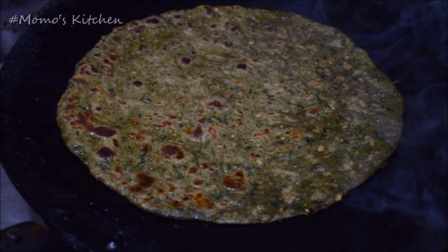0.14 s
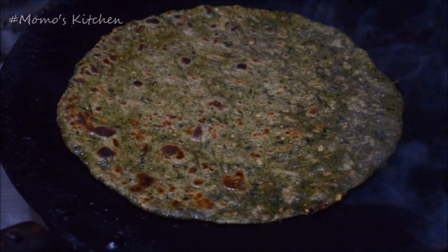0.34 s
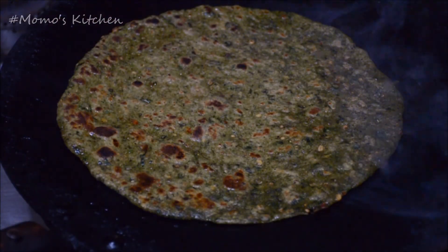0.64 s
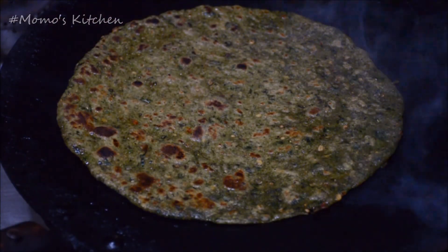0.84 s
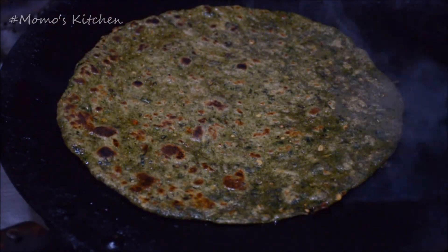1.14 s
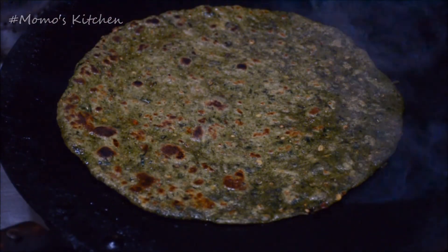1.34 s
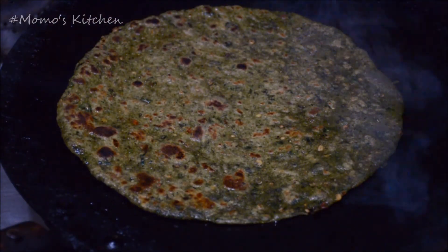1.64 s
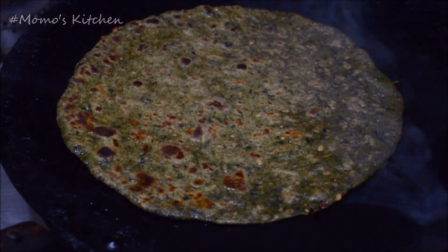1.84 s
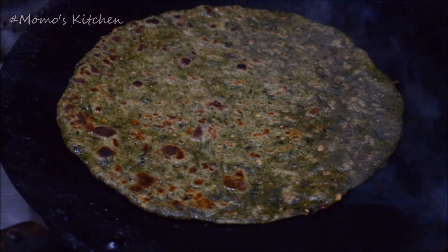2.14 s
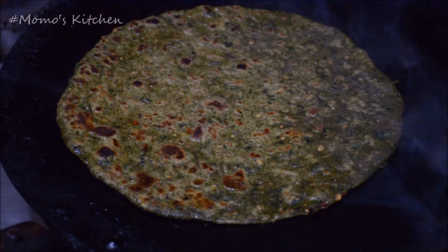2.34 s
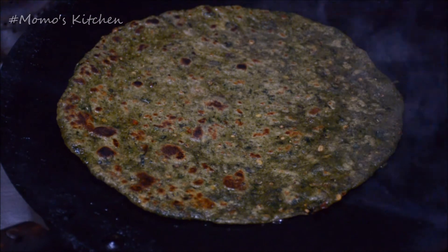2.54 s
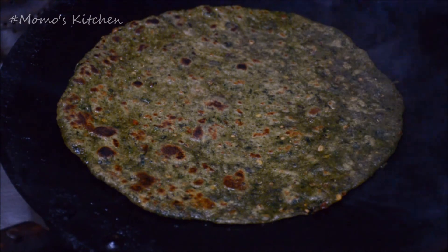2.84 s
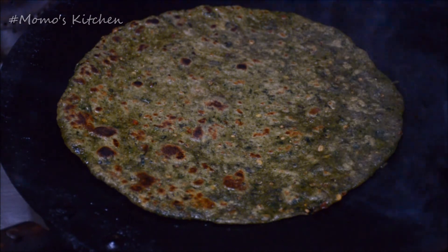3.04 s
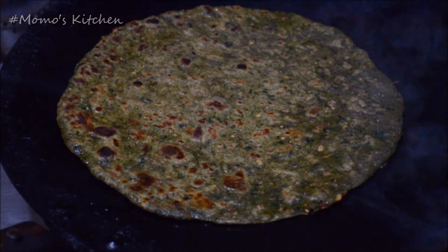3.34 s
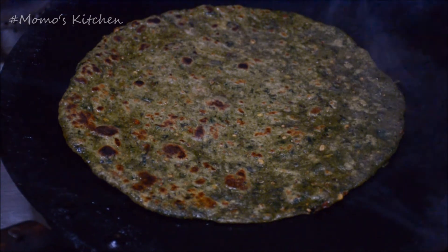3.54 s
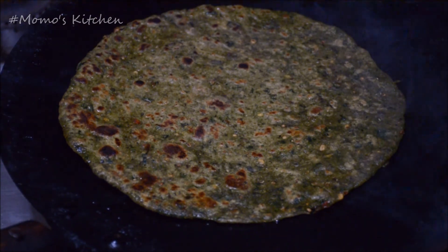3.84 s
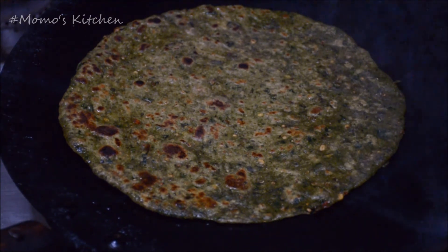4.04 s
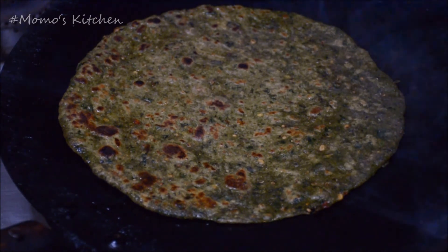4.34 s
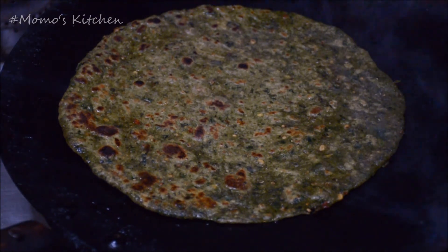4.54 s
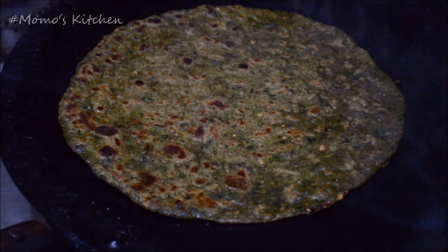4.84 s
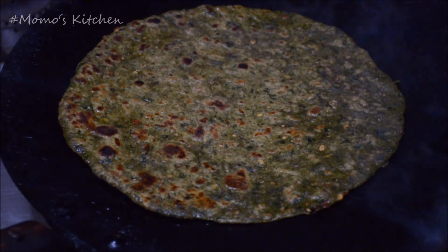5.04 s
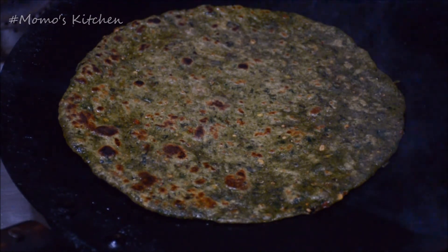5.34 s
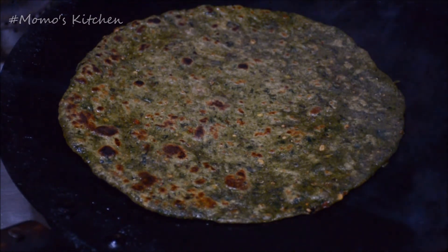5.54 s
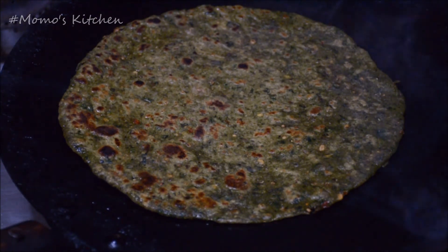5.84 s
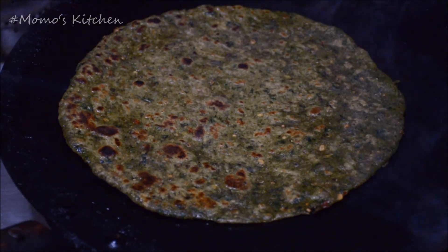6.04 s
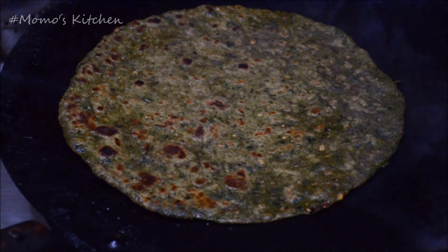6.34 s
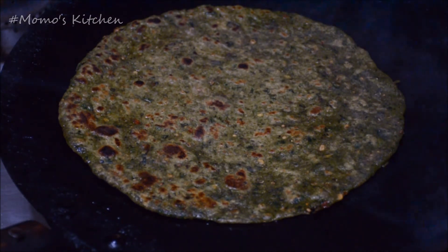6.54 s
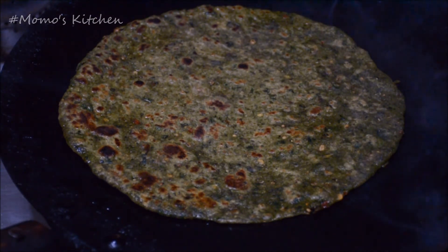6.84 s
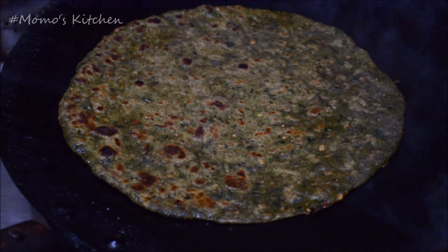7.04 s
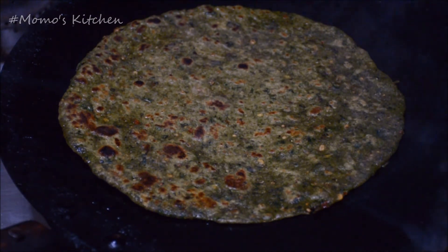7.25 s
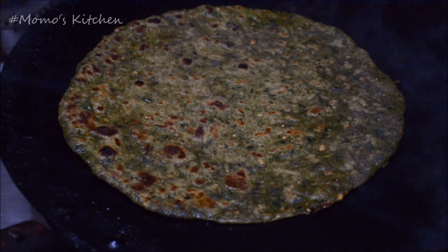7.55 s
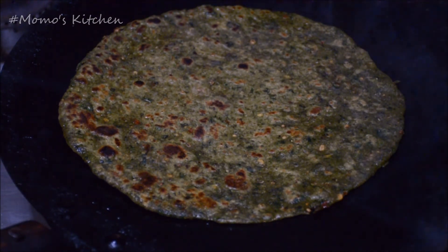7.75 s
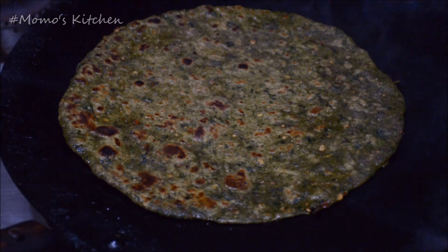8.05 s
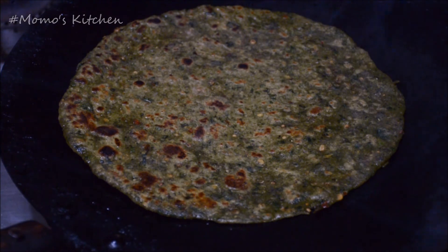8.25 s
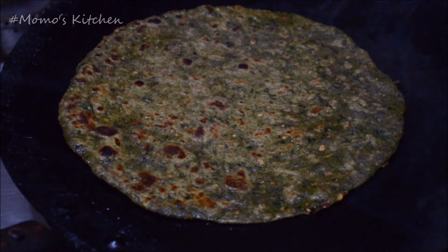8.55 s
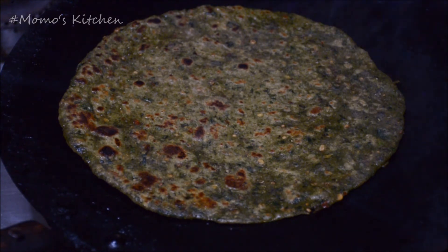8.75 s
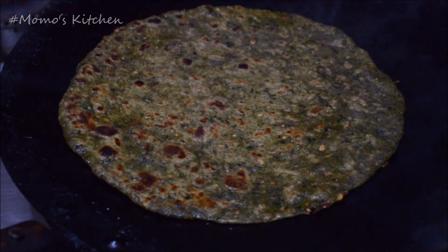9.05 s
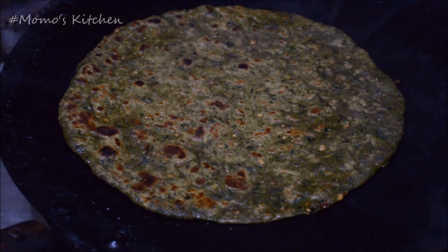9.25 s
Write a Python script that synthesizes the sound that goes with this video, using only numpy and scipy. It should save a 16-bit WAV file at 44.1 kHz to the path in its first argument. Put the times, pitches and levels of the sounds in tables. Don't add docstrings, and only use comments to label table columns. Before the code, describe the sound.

A flatbread fries on an iron griddle, heard from very near in a small, lightly reverberant kitchen. Soft hiss swells and fades over quiet room tone. Irregular bursts under the bread give short, hollow metallic knocks, while fat droplets make sharp, dry clicks with tiny bubbly rebounds and low puffs of air. It starts sparse, grows busiest in the middle, calms after six seconds, and ends on renewed knocks and spits.

```python
import sys
import numpy as np
from scipy import signal
from scipy.fft import rfft, irfft, next_fast_len
from scipy.io import wavfile
from scipy.ndimage import uniform_filter1d, map_coordinates

SR = 44100
rng = np.random.default_rng(int(sys.argv[2]) if len(sys.argv) > 2 else 0)


def dump(signal):
    limited = np.clip(np.atleast_2d(signal).T, -1, 1)
    pcm = np.round(limited * 32767).astype(np.int16)
    wavfile.write(sys.argv[1], SR, pcm)


def elevation(decibels):
    levels = np.asarray(decibels, float)
    return 10 ** (levels / 20)


N = 414099

# time in seconds, level in dB.
ROOM_LEVEL = [
    (0.0, -60.5),
    (2.07, -60.5),
    (2.3, -58.5),
    (2.51, -64.5),
    (4.26, -60.5),
    (4.42, -59),
    (6.49, -63),
    (8.39, -60),
    (9.02, -58),
    (9.39, -61),
]
# frequency in Hz, level in dB per Hz.
ROOM_COLOUR = [(120, -30), (200, -6), (447, -1.5), (577, -3.5), (655, -4), (1220, -5), (1550, -6.5),
               (1850, -5), (4300, -18), (11500, -27), (15700, -39)]
# frequency in Hz, level in dB per Hz.
DRAUGHT_COLOUR = [(15, -3), (40, 2), (120, -1.5), (300, -10.5), (500, -42)]
# frequency in Hz, level in dB per Hz.
PORT_HISS = [(59, -44), (100, -1), (532, -5.5), (1240, -21), (3570, -15.5), (4510, -13.5), (15700, -11)]
# start in seconds, length in seconds, narrow jet in dB, broad sizzle in dB, low fry in dB.
STEAM_SWELLS = [(0.194, 0.17, -81, -74.5, -75), (0.61, 0.19, -96, -85, -64), (0.775, 0.11, -86, -94, -63),
                (0.856, 0.47, -81, -75.5, -71), (1.287, 0.14, -85, -74, -78), (1.49, 0.3, -85, -74, -67),
                (2.465, 0.6, -82, -80, -67), (3.077, 0.21, -72, -72, -67), (3.359, 0.29, -74, -66.5, -63),
                (3.804, 0.2, -80, -84, -66), (4.522, 0.31, -71.5, -89, -66), (5.12, 0.048, -86, -65.5, -65),
                (5.292, 0.25, -76, -68.5, -61.5), (6.407, 0.52, -73.5, -85, -63.5),
                (7.31, 0.3, -75, -72.5, -69.5), (7.905, 0.71, -99, -81, -84), (8.373, 0.11, -80, -78, -62),
                (8.532, 0.32, -72.5, -86, -65)]
# centre in Hz, width in Hz, level in dB.
JET_PEAKS = [(3900, 900, -10), (5220, 500, 3), (6400, 1500, -12), (9600, 960, -16)]
# centre in Hz, width in Hz, level in dB.
SIZZLE_PEAKS = [(5730, 4700, -10), (7000, 2700, 5), (11300, 2900, -3.5)]
# centre in Hz, width in Hz, level in dB.
FRY_PEAKS = [(2180, 4100, -2), (3720, 4200, -23.5)]
# time in seconds, peak in dB, width in ms.
AIR_PUFFS = [(0.1574, -30, 0.5), (1.141, -42, 0.19), (1.654, -44, 0.8), (1.852, -47, 1.8),
             (2.48, -36.5, 1.95), (2.631, -35.5, 1.06), (2.6413, -40, 0.84), (3.442, -35, 1),
             (3.455, -22.5, 0.76), (3.9953, -31.5, 1.54), (4.2127, -23, 0.24), (4.2237, -33, 2.6),
             (4.3023, -28, 1.07), (4.762, -31.5, 2.3), (4.8166, -26, 0.55), (5.3792, -18.5, 1.27),
             (5.989, -28, 0.21), (6.1243, -41, 0.7), (6.222, -37, 0.79), (6.5472, -33.5, 1.8),
             (6.571, -22, 0.73), (7.155, -15, 0.24), (7.2726, -16, 0.36), (7.486, -39, 0.97),
             (7.526, -42, 1.3), (7.5356, -42, 1), (8.341, -29.5, 1.85), (8.616, -37, 2.4),
             (8.747, -38.5, 1.4), (8.991, -29, 2.4), (8.9936, -20, 0.2), (9.006, -30, 0.47),
             (9.017, -32, 1.24), (9.1194, -32.5, 3.4), (9.2211, -37.5, 1.6)]
# time in seconds, peak in dB, width in ms.
AIR_SUCTIONS = [(0.1591, -30, 0.83), (0.182, -34.5, 0.54), (0.268, -26.5, 0.33), (0.9205, -35.5, 0.9),
                (1.062, -18.5, 1.03), (2.081, -30.5, 1.47), (2.4764, -29, 0.28), (2.9985, -32, 0.51),
                (3.119, -41, 1.5), (4.0717, -38.5, 6.7), (4.2043, -8.5, 0.17), (4.7418, -33.5, 0.53),
                (4.9302, -34, 0.79), (4.947, -27.5, 1.85), (4.9871, -41, 2.8), (5.384, -33, 2.2),
                (5.4861, -37, 1.1), (5.5061, -36, 0.55), (5.5919, -31, 1.1), (5.8973, -30, 1.36),
                (6.003, -28.5, 0.86), (6.0912, -39.5, 1.65), (7.495, -32.5, 2.6), (7.7802, -27.5, 1.1),
                (8.048, -46, 0.8), (8.096, -45.5, 1.5), (8.489, -31.5, 0.24), (8.544, -33.5, 2.17),
                (8.6105, -41, 0.7), (8.7092, -34.5, 0.78), (9.276, -36, 2.5)]
# time in seconds, peak in dB, width in ms, splash in dB relative to the peak.
DROPLET_SPITS = [(0.2682, -23, 0.097, -32), (1.1703, -25, 0.05, -12), (2.663, -36.5, 0.41, -31),
                 (3.4212, -41, 0.45, -13), (3.4555, -16, 0.13, -42), (4.2042, -13.5, 0.15, -38),
                 (4.241, -21, 0.12, -38), (4.7696, -17.5, 0.13, -40), (4.788, -28, 0.15, -34),
                 (4.8129, -25, 0.12, -37), (5.381, -9.5, 0.15, -26), (5.9071, -17.5, 0.12, -39),
                 (5.9201, -25, 0.092, -28), (6.0018, -33, 0.099, -29), (6.5423, -29.5, 0.4, -34),
                 (6.5706, -24.5, 0.16, -38.6), (6.588, -34, 0.081, -33), (7.156, -37, 0.14, -33),
                 (7.2722, -19.5, 0.072, -18), (7.278, -32, 0.099, -23), (9.0066, -26, 0.13, -36),
                 (9.017, -22.5, 0.11, -44), (9.085, -24, 0.07, -27)]
# rebound rate in Hz, level in dB relative to the spike.
SPIT_REBOUNDS = [(1220.0, -21), (2200.0, -19), (1000.0, -26), (6300.0, -14), (2080, -6), (1470.0, -11.5),
                 (2200.0, -12), (1050.0, -15), (1920.0, -19), (1920.0, -12), (870, -25), (1100.0, -17),
                 (1760.0, -19), (2590.0, -3), (920.0, -25), (5430, -25), (1430, -21), (2100.0, -12),
                 (2550, -43), (1000.0, -3), (1290, -26), (6340, -34), (1220.0, -10)]
# time in seconds, peak in dB, width in ms, splash in dB relative to the peak.
BUBBLE_COLLAPSES = [(0.1577, -20, 0.1, -21.5), (0.2055, -32, 0.12, -26), (0.9203, -31, 0.51, -38),
                    (1.0636, -19.5, 0.24, -41), (1.1414, -20.5, 0.17, -33), (3.218, -22, 0.097, -29),
                    (4.0024, -18.5, 0.15, -29.5), (4.379, -20.5, 0.14, -37), (4.413, -37, 0.17, -31),
                    (4.7506, -26.5, 0.12, -36), (4.8164, -23, 0.13, -30), (4.9107, -22.5, 0.099, -14.5),
                    (5.0303, -21, 0.11, -30), (5.459, -28, 0.098, -23), (5.4853, -28, 0.096, -16.5),
                    (5.5051, -30, 0.12, -32), (5.5912, -10, 0.11, -27), (5.8478, -32.5, 0.057, -7),
                    (5.9887, -28, 0.12, -32), (6.105, -39, 0.3, -26), (6.1256, -19, 0.13, -29),
                    (6.3143, -27, 0.17, -38), (7.7804, -11.5, 0.13, -27.5), (8.469, -33, 0.14, -21),
                    (8.648, -37, 0.13, -16), (9.1066, -26.5, 0.09, -22), (9.1232, -17, 0.12, -34),
                    (9.276, -15, 0.12, -34)]
# rebound rate in Hz, level in dB relative to the spike.
COLLAPSE_REBOUNDS = [(950, -15), (1760.0, -17), (3680.0, -25), (1630.0, -23), (1130.0, -27), (1630, -8),
                     (1630.0, -15), (1420.0, -15), (1170, -3), (1030, -12), (2100.0, -10), (2680, -6.5),
                     (2080, -10.5), (980.0, -24), (2760.0, -12), (770.0, -27), (800, -14.5), (2760.0, -23),
                     (1760.0, -12), (3680.0, -30), (1780, -15), (1220.0, -10), (1095, -11.5), (2200.0, -7),
                     (3150.0, -22), (1750, -6), (1340.0, -30), (2000.0, -14)]
# centre in Hz, width in Hz, level in dB.
CAPSULE_PEAKS = [(3340, 500, 8), (4440, 470, 11), (6900, 2060, 8.5), (8600, 4000, -3.5)]
# frequency in Hz, level in dB, decay by 60 dB in seconds.
GRIDDLE_MODES = [(435, -18.5, 0.86), (571, -8.5, 0.43), (587.7, 0.5, 0.38), (650, -11, 0.15),
                 (748.2, 1.5, 0.18), (891, -8, 0.48), (910.6, -5.5, 0.17), (1067, -1.5, 0.17),
                 (1150, -13.5, 0.12), (1190, -3.5, 0.22), (1240, -6, 0.35), (1303, -4.5, 0.35),
                 (1354, -4, 0.29), (1403, -7, 0.19), (1576, -31, 0.068), (1696, -4, 0.32),
                 (1778, -1.5, 0.26), (2016, -10, 0.46), (1850, -3, 0.23), (1916, -0.5, 0.36),
                 (2178, -17, 0.2), (2300, -31, 0.1), (2400, -12, 0.4), (2630, -5, 0.14),
                 (2782, -8.5, 0.083)]
# time in seconds, peak in dB, low modes and crack in dB relative to the peak, favoured mode in Hz.
BIG_BURSTS = [(1.291, -29, -4.5, -23, 1374), (2.1243, -28.5, 9, -2.5, 1310),
              (2.1406, -21, -5.5, -15.5, 1276), (2.1741, -22, -4, -20, 1160),
              (2.367, -25.5, -6.5, -11, 1285), (2.9928, -24.5, 3, -5, 1255),
              (3.1696, -24, -1.5, -13.5, 1175), (3.834, -27.5, 2, -8.5, 1240), (3.8904, -29, 0, -23, 1208),
              (4.305, -27, 3, -7, 1240), (4.4782, -15.5, -4, -14.5, 1170), (4.8373, -25, 2.5, -9, 1100),
              (5.0585, -17, -4.5, -16, 1193), (5.3706, -28, 3.5, -5.5, 1240), (5.636, -17, -5.5, -21, 1110),
              (5.861, -24.5, -1, -11, 1140), (7.1406, -27.5, -4, -27.5, 1370), (7.4689, -31, -6.5, 7, 1340),
              (8.347, -28.5, 4.5, -3.5, 1240), (8.766, -17, -5.5, -17, 1200),
              (9.0402, -27, 3.5, -9.5, 1220), (9.3143, -16.5, -4.5, -11.5, 1164)]
# modes near 590 Hz and near 900 Hz, in dB over the 750 Hz mode.
BIG_BURST_SHARES = [(7, -21), (5, -4), (4, 5), (-9, 1), (10, -2), (-2.5, 3), (-13, -5), (2.5, -9),
                    (-6, -14), (4, 10), (-1, -6), (5.5, 2), (4.5, -16), (1, 4), (2.5, -12), (5, 2.5),
                    (0.5, -9), (-5, 4), (5.5, 0), (5.5, -9), (3.5, 3.5), (8.5, -7)]
# time in seconds, peak in dB, low modes, crack and high modes in dB relative to the peak.
SMALL_POPS = [(0.391, -54.5, 14, 2, 0), (0.5077, -23.5, 1, -10.5, -5), (0.6548, -39, -3, -28, -23),
              (0.7787, -45.5, -25, -6, -10), (0.805, -44, -20, -4, -14), (0.843, -54, 10.5, -20, -17),
              (0.866, -50, -8, -15, -14), (1.3222, -35, -29, -22, -15), (1.4384, -49.5, 10.5, -24, -14),
              (1.5264, -70.5, 10, 16, 15.5), (2.0917, -49.5, 12, 1, 0.5), (2.111, -38.5, 0, 6.5, -3),
              (3.4445, -33, 4.5, -14, -21), (3.8198, -34.5, 0.5, -2.5, -8), (6.4194, -32.5, -2, -22, -17),
              (6.508, -57, 5, 5, -3), (6.5883, -58.5, 10, 10, 5), (6.8437, -52, 0, -7, -18),
              (6.8598, -45, 10.5, -4, -10), (6.9272, -45.5, 1, -19, -21), (7.446, -50.5, -3, -3, -2),
              (7.4826, -25, -5.5, -10.5, 2.5), (7.896, -40, 13.5, -6, -10),
              (8.8199, -33.5, -23, -39, -15.5), (8.915, -56.5, 18, 1, -3)]
# modes near 590 Hz and near 900 Hz in dB over the 750 Hz mode, favoured mode in Hz.
SMALL_POP_SHARES = [(-15, -11, 1290), (8, -16, 1244), (-4, -10, 1200), (-5, -10, 1300), (-9, -10, 1310),
                    (5, -12, 1250), (0, -5, 1300), (5, -7, 1330), (-2, -8, 1280), (16, 3, 1357),
                    (-4, -9, 1308), (2, -2, 1314), (-5, -4, 1300), (-9, 3, 1250), (0, -15, 1254),
                    (0, -5, 1240), (-7, -8, 1550), (-7, -4, 1300), (-5, 0, 1250), (0, -10, 2100),
                    (-7, 2, 1250), (-11, 2.5, 1300), (-10, -8, 1249), (21, -2, 1244), (-7, -8, 1190)]
# frequency in Hz, level in dB.
WALL_COLOUR = [(250, -3), (420, 0), (1200, -2.5), (1600, 0.5), (2200, 3.5), (3200, -10.5), (6000, -23.5),
               (10000, -36), (13000, -50), (16000, -61)]
# frequency in Hz, decay by 60 dB in seconds.
KITCHEN_DECAY = [(300, 0.69), (1200, 0.59), (2500, 0.42), (5000, 0.3), (12000, 0.33)]


def along(points, hz):
    f, v = np.transpose(points)
    return np.interp(np.log(hz + 1), np.log(f + 1), v)


def shaped(spectrum):
    return lambda hz: elevation(along(spectrum, hz))


def resonant(peaks):
    return lambda hz: sum(elevation(db) / (1 + ((hz - c) / w * 2) ** 2) for c, w, db in peaks)


def filtered(x, response):
    m = next_fast_len(N + SR // 2)
    return irfft(rfft(x, m) * response(np.fft.rfftfreq(m, 1 / SR)), m)[..., :N]


def unit(x):
    return x / np.sqrt(np.mean(x ** 2) + 1e-20)


def rush(colour, patchy_db):
    z = signal.stft(rng.standard_normal(N + 512), nperseg=512)[2]
    field = uniform_filter1d(rng.standard_normal(z.shape), 8, 0)
    field = uniform_filter1d(field, 10, 1)
    noise = signal.istft(z * elevation(patchy_db * unit(field)), nperseg=512)[1][:N]
    return unit(filtered(noise, colour))


def placed(times, shapes, before):
    index = np.round(times * SR).astype(int)[:, None] - before + np.arange(shapes.shape[1])
    return np.bincount(index.ravel(), shapes.ravel(), N + SR)[:N]


def air(gusts):
    tone_db = np.interp(np.arange(N) / SR, *np.transpose(ROOM_LEVEL))
    tone = elevation(tone_db - 4.5) * rush(shaped(ROOM_COLOUR), patchy_db=0.14)
    stirred = uniform_filter1d(np.abs(gusts), 3000, origin=1400)
    stirred = np.abs(uniform_filter1d(stirred, 800)) ** 0.69
    lumps_db = 3.5 * map_coordinates(rng.standard_normal(N // 1500 + 4), [np.arange(N) / 1500])
    draught = unit(elevation(lumps_db) * rush(shaped(DRAUGHT_COLOUR), patchy_db=4.0))
    return tone + (elevation(-69.5) + elevation(-27) * stirred) * draught


def steam():
    start, length, *levels = np.transpose(STEAM_SWELLS)[:, :, None]
    u = (np.arange(0, N + 64, 64) / SR - start) / length
    swell = np.exp(-np.abs(2 * u - 1) ** 2.9)
    jet, sizzle, fry = [np.repeat(np.sum(elevation(db) * swell, axis=0), 64)[:N] for db in levels]
    humming = FRY_PEAKS + [(hz, 45, db) for hz, db, t60 in GRIDDLE_MODES]
    hiss = jet * rush(resonant(JET_PEAKS), patchy_db=3)
    hiss = hiss + sizzle * rush(resonant(SIZZLE_PEAKS), patchy_db=3.2)
    return hiss + fry * rush(resonant(humming), patchy_db=2.4)


def puffs():
    s, db, width_ms = np.transpose(AIR_PUFFS + AIR_SUCTIONS)[:, :, None]
    direction = np.where(np.arange(len(s)) < len(AIR_PUFFS), 1, -1)[:, None]
    u = np.arange(-1200, 800) / SR * 1000 / np.clip(width_ms, 0.2, 6)
    lead = 0.62 * np.exp(-(u + 2) ** 2)
    lump = direction * elevation(db) * (np.exp(-u * u) - lead)
    mesh_hz, vent_hz = 500, 40

    def capsule(f):
        return f * f / (f * f + vent_hz ** 2) / (1 + (f / mesh_hz) ** 6)

    return filtered(placed(s[:, 0], lump, before=1200), capsule)


def spits():
    s, db, width_ms, splash_db = np.transpose(DROPLET_SPITS + BUBBLE_COLLAPSES)[:, :, None]
    direction = np.where(np.arange(len(s)) < len(DROPLET_SPITS), 1, -1)[:, None]
    rebound_hz, rebound_db = np.transpose(SPIT_REBOUNDS + COLLAPSE_REBOUNDS)[:, :, None]
    t = np.arange(-100, 300) / SR
    u = t * 1000 / width_ms

    def shape(u):
        return np.exp(-u * u / (1 + 1.2 * np.logaddexp(0, u)))

    spike = shape(u)
    cycle = 1000 / rebound_hz / width_ms
    stray = rng.normal(0, 0.08, (len(s), 4))
    swing = 0
    for k in range(4):
        late = cycle * (k + 1 + stray[:, k, None])
        swing = swing + elevation(3.5 - 7 * k) * shape(1.1 * (u - late))
    swell = np.exp(t / 0.001) * (t < 0) * (1 - spike)
    pulse = direction * elevation(db) * (spike - 0.092 * swell + elevation(rebound_db) * swing)
    splash = elevation(splash_db) * rng.standard_normal((len(s), len(t)))
    splash = splash * (t > 0) * elevation(-60 * np.abs(t) / 0.0045)
    ticks = placed(s[:, 0], elevation(db) * splash, before=100)
    return placed(s[:, 0], pulse, before=100) + filtered(ticks, resonant(CAPSULE_PEAKS))


def bursts():
    big = [(s, db, low, crack, -6 + 0.53 * crack, hz) for s, db, low, crack, hz in BIG_BURSTS]
    pops = [(*pop, hz) for pop, (deep, upper, hz) in zip(SMALL_POPS, SMALL_POP_SHARES)]
    s, db, low_db, crack_db, high_db, favoured_hz = np.transpose(big + pops)[:, :, None]
    shares = BIG_BURST_SHARES + [share[:2] for share in SMALL_POP_SHARES]
    deep_db, upper_db = np.transpose(shares)[:, :, None]
    t = np.arange(SR // 2) / SR
    hz, level_db, t60 = np.transpose(GRIDDLE_MODES)

    def above(f, edge_hz, steep):
        return 1 / (1 + (edge_hz / (f + 1)) ** steep)

    def colour_db(f):
        low = (low_db - 0.5) * (1 - above(f, 1073, 12.0))
        high = (high_db + 4.5) * above(f, 1484, 9.7)
        return low + high + (crack_db - high_db + 8.5) * above(f, 3120, 8.1)

    spot_db = 12 * np.exp(-(np.log(hz / favoured_hz) / 0.055) ** 2) - 1
    share_db = (deep_db - 3.1) * ((hz > 520) & (hz < 670))
    share_db = share_db + (upper_db + 1.1) * ((hz > 850) & (hz < 950))
    chance = rng.standard_normal((len(s), 2, len(hz)))
    strength = elevation(spot_db + share_db + level_db + 0.64 * chance[:, 0])
    swings = elevation(-60 * t / t60[:, None]) * np.exp(2j * np.pi * hz[:, None] * t)
    struck = elevation(db - 17 + colour_db(hz) - 2 * above(hz, 1500, 9)) * strength
    ring = np.imag((struck * np.exp(0.7j * chance[:, 1])) @ swings)

    f, frames, z = signal.stft(rng.standard_normal((len(s), len(t))), SR, nperseg=768)
    blur = 1 / (1 + ((f - hz[:, None]) / 26) ** 2) ** 2
    blurred = np.sqrt(strength ** 2 @ blur)
    fade = elevation(-60 * frames / along(KITCHEN_DECAY, f)[:, None])
    crack = elevation(along(WALL_COLOUR, f))[:, None] * fade ** 1.5
    z = z * elevation(db - 5.5 + colour_db(f))[:, :, None] * (blurred[:, :, None] * fade + crack)
    walls = signal.istft(z, SR, nperseg=768)[1][:, :len(t)]

    damping = 1 + 1.23 * np.exp(-(t / 0.016) ** 2)
    onset = 1 - np.exp(-t / 0.00076)
    knocks = placed(s[:, 0], (ring + walls) * damping * onset, before=50)
    rim_hz = 320
    return signal.lfilter(*signal.butter(2, rim_hz, "high", fs=SR), knocks)


def scene():
    gusts = puffs()
    mono = air(gusts) + steam() + gusts + spits() + bursts()
    return mono * elevation([[0.16], [-0.16]])


def band_limit(x):
    return signal.sosfilt(signal.butter(12, 16320, fs=SR, output="sos"), x)


def record(dry):
    hiss = elevation(-82) * np.array([rush(shaped(PORT_HISS), patchy_db=1.5) for port in dry])
    top_hz, bass_cut_hz = 15740, 25

    def band(hz):
        return (hz < top_hz) * hz * hz / (hz * hz + bass_cut_hz ** 2)

    return band_limit(filtered(dry + hiss, band))


dry = scene()
out = record(dry)
dump(out)
```